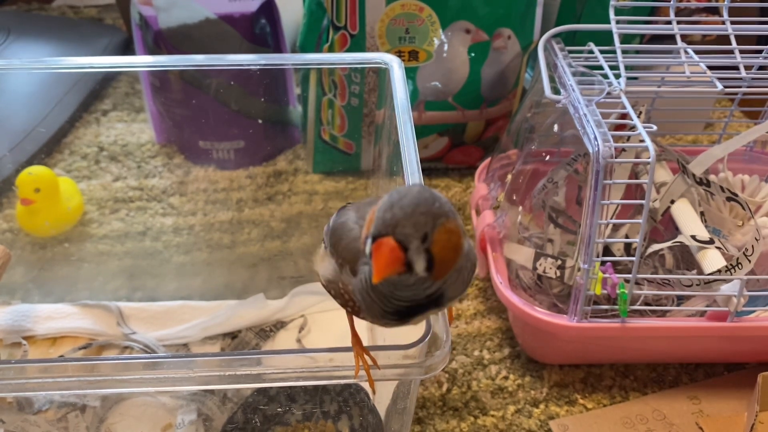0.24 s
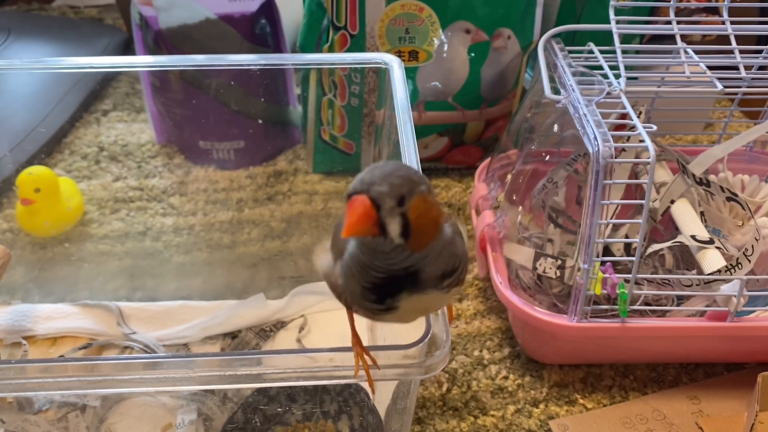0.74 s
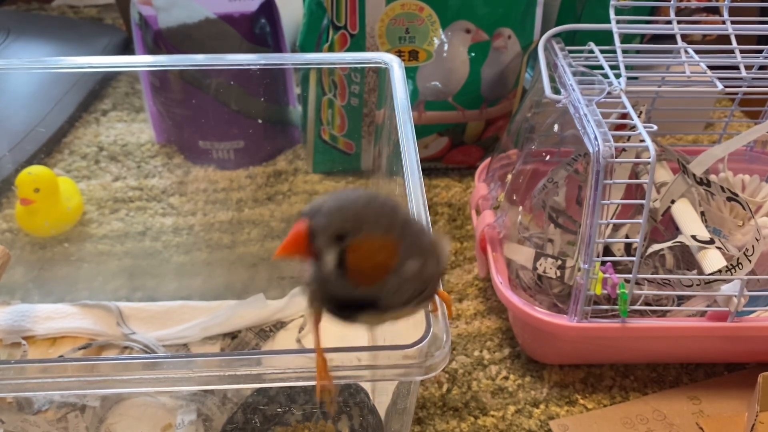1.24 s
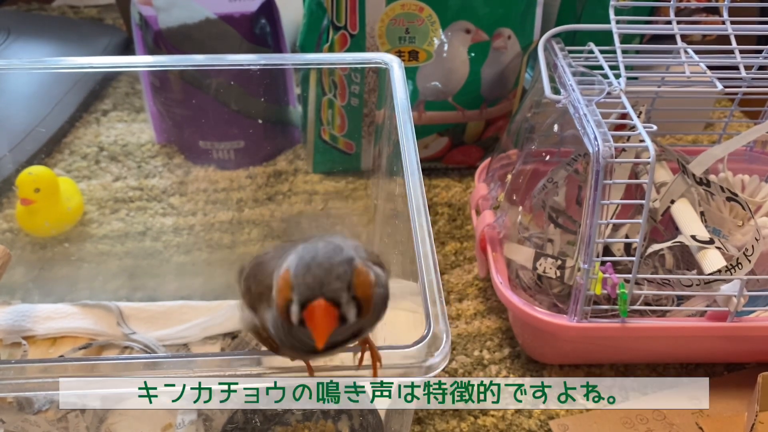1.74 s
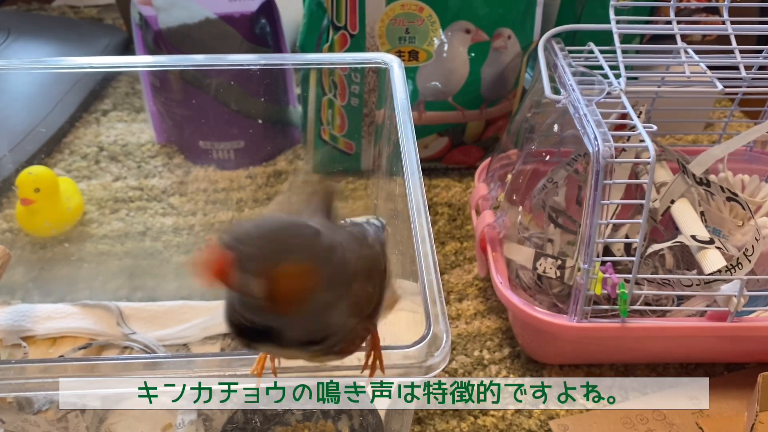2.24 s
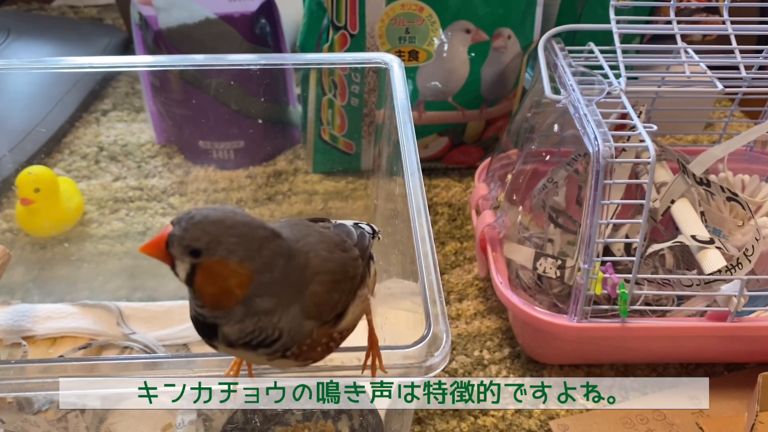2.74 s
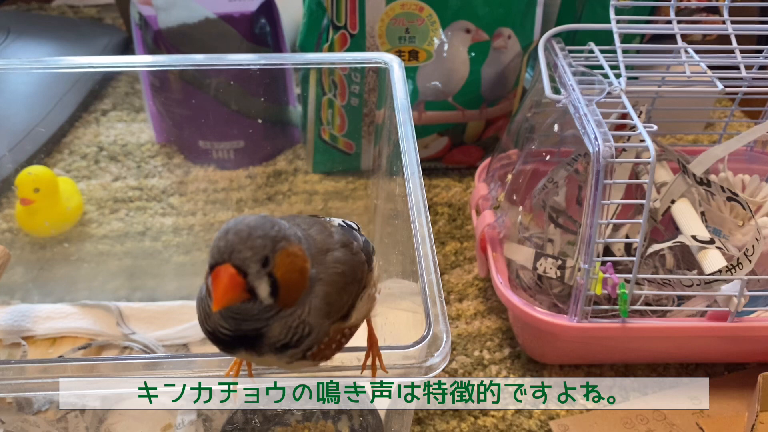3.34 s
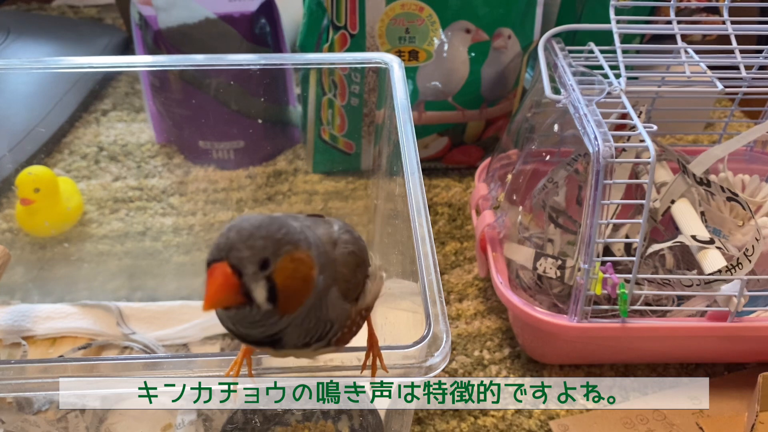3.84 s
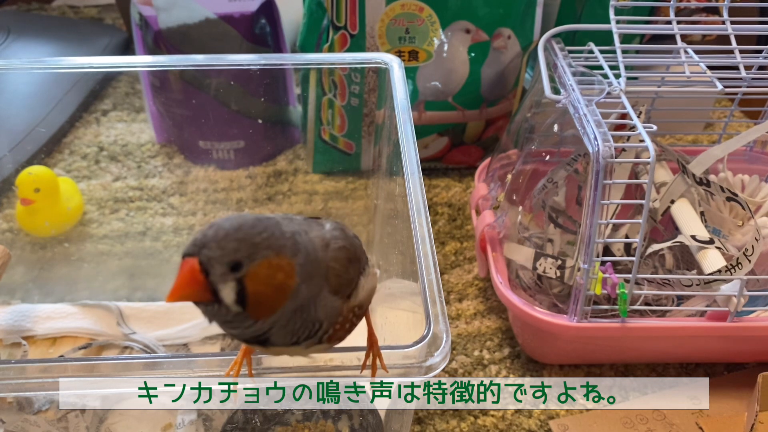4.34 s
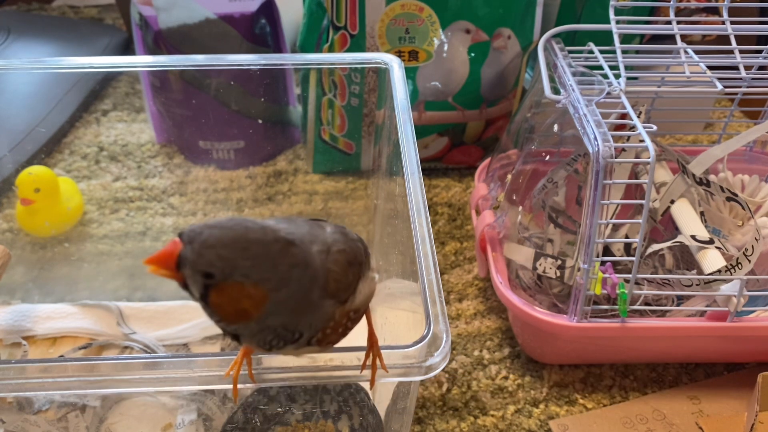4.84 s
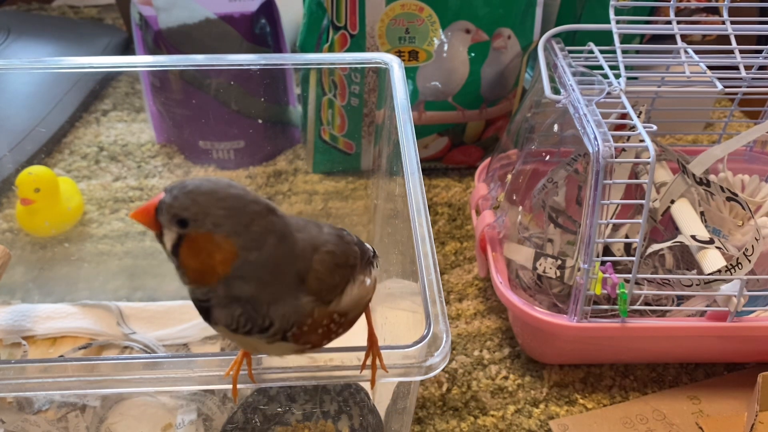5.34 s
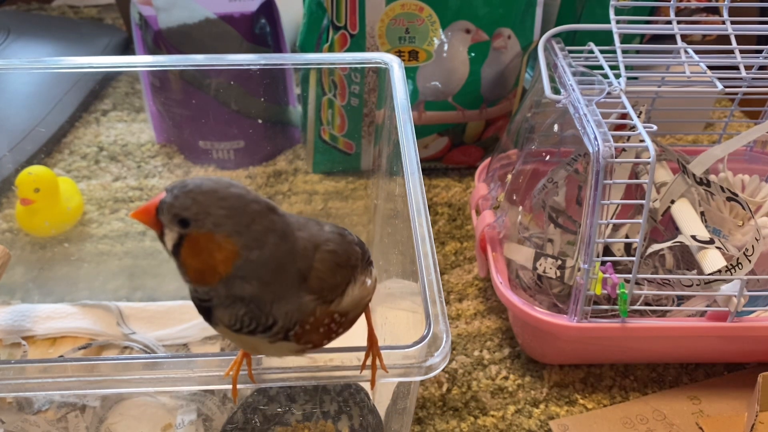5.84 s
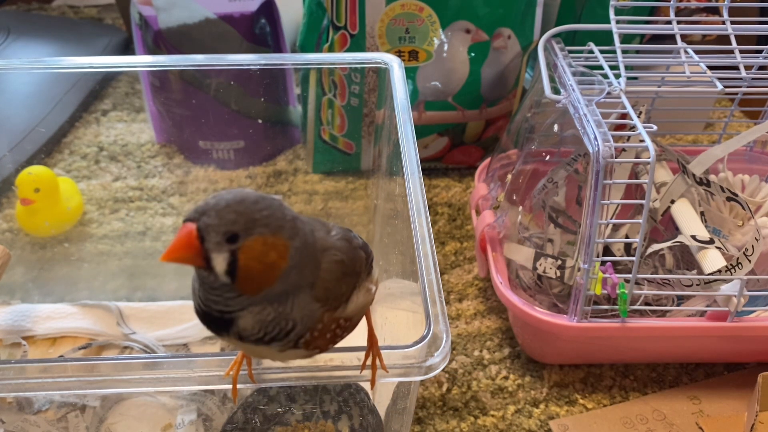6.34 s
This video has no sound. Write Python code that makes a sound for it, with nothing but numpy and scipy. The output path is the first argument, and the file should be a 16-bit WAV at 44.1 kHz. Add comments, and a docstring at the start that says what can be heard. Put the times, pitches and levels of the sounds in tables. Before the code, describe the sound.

A pet finch gives short nasal notes, hops with fluttering wings, chirps, squeaks and makes one loud nasal call in a quiet room.

```python
"""A pet zebra finch on a plastic box, left of a stereo microphone in a quiet room with a low hum.
It gives a short nasal 'tet', hops with a flutter of wings, chirps twice and squeaks, then utters one
loud two-part nasal call and a last 'tet'. Its voice is syrinx pulses and turbulent air ringing in
throat and beak; feathers, wingbeats and claws on the plastic make short bursts of noise."""
import sys
import numpy as np
from scipy import signal
from scipy.fft import rfft, irfft, next_fast_len
from scipy.io import wavfile

SR = 44100
rng = np.random.default_rng(int(sys.argv[2]) if len(sys.argv) > 2 else 0)


def put_to_file(sound):
    """Save the sound as 16-bit audio at rate SR, in the file named by the first command-line argument."""
    columns = np.atleast_2d(sound).T  # one column per channel
    safe = np.clip(columns, -1, 1)
    whole_steps = np.round(safe * 32767)
    wavfile.write(sys.argv[1], SR, whole_steps.astype(np.int16))


N = 290619
TIME = np.arange(N) / SR
FFT_SIZE = 2 * next_fast_len(N // 2 + SR // 20)
BIN_HZ = np.fft.rfftfreq(FFT_SIZE, 1 / SR)
CUTOFF_HZ = 16000


def from_db(db):
    return 10 ** (np.asarray(db) / 20)


def rms_one(x):
    return x / np.sqrt(np.mean(x ** 2) + 1e-20)


def at_hz(points, hz, column=1):
    """Read a column of a spectrum on a log-frequency axis."""
    points = np.array(points)
    return np.interp(np.log(hz + 1e-3), np.log(points[:, 0]), points[:, column])


def drift(rate_hz, size):
    """Smooth random wander of spread 1."""
    hz = np.fft.rfftfreq(size, 1 / SR)
    return rms_one(irfft(rfft(rng.standard_normal(size)) / (1 + (hz / rate_hz) ** 2), size))


def colour(x, spectrum):
    """Causal (minimum-phase) filter with the given spectrum."""
    size = 2 * next_fast_len(x.shape[-1] // 2 + SR // 20)
    gain = from_db(at_hz(spectrum, np.fft.rfftfreq(size, 1 / SR)))
    cepstrum = irfft(np.log(gain))
    cepstrum[1:size // 2] *= 2
    cepstrum[size // 2 + 1:] = 0
    return irfft(rfft(x, size) * np.exp(rfft(cepstrum)))[..., :x.shape[-1]]


def stereo_noise(spectrum, width):
    """Steady noise, shared by both channels apart from a side part."""
    mid, side = colour(rng.standard_normal((2, N)), spectrum)
    return rms_one(mid) + width * rms_one(side) * np.array([[1], [-1]])


# Rumble and hiss of the room at rest: freq_hz, gain_db
ROOM_RUMBLE = [(15, -38), (30, -21), (44, -5.5), (68, 1), (95, -2.5), (120, -1.5), (140, -13), (160, -16.5),
               (182, -9.5), (208, -18), (235, -13), (280, -19.5), (400, -34.5), (1500, -90.5)]
ROOM_HISS = [(300, -5.5), (450, 1.5), (800, 0.5), (1400, -6.5), (2350, -5.5), (2650, -2.5), (3200, -7.5),
             (4200, -10), (4750, -0.5), (5200, -9.5), (7300, -14), (9000, -24.5), (12000, -27.5),
             (16000, -42)]
# Hum and faint motor tones in the room: pitch_hz, level_db
HUM_TONES = [(116, -55.5), (475, -77), (820, -81), (1060, -84), (1140, -81)]

def room_tone(rumble_db=-50, hiss_db=-66.8):
    """Low rumble and a wavering hum, a little right of the microphone, under a faint hiss."""
    hum = np.zeros(N)
    for pitch_hz, level_db in HUM_TONES:
        phase = 2 * np.pi * np.cumsum(pitch_hz + 3 * drift(6, N)) / SR
        hum += np.sin(phase) * from_db(level_db + 2.3 * drift(5.4, N))
    low = from_db(rumble_db) * stereo_noise(ROOM_RUMBLE, width=.249) + hum
    hiss = from_db(hiss_db) * stereo_noise(ROOM_HISS, width=.84)
    return low * from_db([[-1.7], [1.5]]) + hiss


def glide(start_s, length_s, first_hz, last_hz, level_db, attack_s, release_s, bend=1, edge_db=20):
    """Gesture of a short note that slides, swells and sinks: time_s, pitch_hz, level_db."""
    age = np.arange(0, length_s, 1 / 4000)
    remaining = length_s - age
    pitch = last_hz + (first_hz - last_hz) * (remaining / length_s) ** bend
    edges = np.clip(1 - age / attack_s, 0, 1) ** 2 + np.clip(1 - remaining / release_s, 0, 1) ** 2
    return np.column_stack([start_s + age, pitch, level_db - edge_db * edges])


# Turbulent air in the voice: freq_hz, gain_db
BREATH = [(500, -4), (3000, -2.5), (6000, 4.5), (10000, 8.5), (16000, 6.5)]
# The beak held still: time_s, mouth_hz, resonance_db, treble_db
BEAK_AT_REST = [(0, 3200, -1, 6.5)]

def syrinx(gesture, throat, rough, jitter, gain_db=0, gape=BEAK_AT_REST):
    """Syrinx pulses, each with a spurt of turbulence, ring in throat and beak."""
    times, pitch_hz, level_db = np.transpose(gesture)
    fade_s = .004
    span = (TIME > times.min() - fade_s) & (TIME < times.max() + fade_s)
    t = TIME[span]
    pitch = np.interp(t, times, pitch_hz) * (1 + jitter * drift(460, len(t)))
    phase = 2 * np.pi * np.cumsum(pitch) / SR
    harmonic = np.arange(1, int(CUTOFF_HZ / pitch.min()) + 1)[:, None]
    gape_s, *columns = np.transpose(gape)
    mouth_hz, resonance_db, treble_db = (np.interp(t, gape_s, column) for column in columns)
    mouth = from_db(resonance_db * np.exp(-(np.log2(harmonic * pitch / mouth_hz) / .26) ** 2))
    partials = mouth * np.cos(harmonic * phase) * (harmonic * pitch < CUTOFF_HZ)
    pulses = rms_one(partials.sum(axis=0))
    spurts = rms_one(colour(rng.standard_normal(len(t)) * (1 + np.cos(phase)), BREATH))
    voice = colour(pulses + rough * spurts, throat)
    treble = signal.sosfiltfilt(signal.butter(3, 5500, "high", fs=SR, output="sos"), voice)
    voice += (from_db(treble_db) - 1) * treble
    # loudness follows the air pressure, wherever the harmonics fall
    power = signal.convolve(voice ** 2, np.hanning(SR // 150), "same") / (SR // 300)
    pressure = from_db(gain_db + np.interp(t, times, level_db))
    fade = np.clip(np.minimum(t - t[0], t[-1] - t) / fade_s, 0, 1) ** 2
    out = np.zeros(N)
    out[span] = voice / np.sqrt(np.abs(power) + 1e-12) * pressure * fade
    return out


# A faint note from the perch: start_s, length_s, first_hz, last_hz, level_db
FAINT_NOTE = (0, .06, 2290, 2480, -49)
# Its throat colour: freq_hz, gain_db
FAINT_COLOUR = [(800, -14), (1700, -9), (2400, 1), (3200, -9), (4700, -28), (8000, -40), (16000, -36)]

def thin_note():
    """A thin rising note, more breath than tone."""
    gesture = glide(*FAINT_NOTE, attack_s=.001, release_s=.065, bend=2.5)
    return syrinx(gesture, FAINT_COLOUR, rough=2.5, jitter=.04)


def near_walls(x, level_db, t60_s=.022):
    """The hard walls of the box, close to the bird, scatter its voice back within milliseconds."""
    t = TIME[:SR // 40]
    scatter = rng.standard_normal(len(t)) * from_db(-60 * t / t60_s) * (t > .0005)
    response = (t == 0) + from_db(level_db) * scatter / np.linalg.norm(scatter)
    return signal.fftconvolve(x, response / np.linalg.norm(response))[:N]


# 'Tet' calls at the box: start_s, length_s, first_hz, last_hz, level_db, attack_s, widest_s, open_s
TET_NOTES = [(.308, .022, 680, 520, -42.5, .003, .005, .008),
             (.3255, .0375, 545, 445, -28.6, .007, .004, .011),
             (6.0205, .042, 760, 440, -30.3, .018, .009, .005)]
# Their throat colour: freq_hz, gain_db
TET_COLOUR = [(440, -11), (620, -4.5), (850, -2.5), (1300, -6.5), (2400, -1), (3100, -2), (4200, -8),
              (5200, -8), (6300, -12.5), (7500, -17.5), (9000, -14.5), (10500, -24.5), (13000, -29),
              (15500, -27)]
BEAK_NARROW, BEAK_WIDE = (3200, 6.5, -6), (6800, 8, 2)   # mouth_hz, resonance_db, treble_db

def tets(second_ratio=1.32, second_db=-7):
    """Both sides of the syrinx pulse unevenly, one faster and weaker, as the beak flicks open."""
    out = np.zeros(N)
    for *note, widest_s, open_s in TET_NOTES:
        first_side = glide(*note, release_s=.018, bend=3)
        second_side = first_side * [1, second_ratio, 1] + [0, 0, second_db]
        t = first_side[:, 0]
        wide = np.exp(-((t - t[0] - widest_s) / open_s) ** 2)
        gape = np.column_stack([t, np.outer(wide, BEAK_WIDE) + np.outer(1 - wide, BEAK_NARROW)])
        for side in (first_side, second_side):
            out += syrinx(side, TET_COLOUR, rough=.28, jitter=.035, gape=gape)
    return near_walls(out, level_db=-4)


def bursts(events, spectrum, rise_s, grain_db):
    """Brief grainy bursts of friction or air, dying away in one shared colour."""
    envelope = np.zeros(N)
    for start_s, level_db, decay_s in events:
        age = np.clip(TIME - start_s, 0, 1)
        envelope += from_db(level_db - 60 * age / (decay_s + rise_s)) * (1 - np.exp(-age / rise_s))
    grains = rng.standard_normal(N) * from_db(grain_db * drift(700, N))
    return colour(grains * envelope, spectrum) / np.std(colour(grains, spectrum))


# Feet landing on the box: start_s, level_db, decay_s
FOOTFALLS = [(1.226, -57, .16), (1.26, -55.5, .11), (1.588, -47.5, .058), (1.65, -51, .1),
             (1.9635, -37.5, .045), (1.977, -51.5, .15), (2.297, -58, .097), (3.668, -57, .05),
             (3.84, -55, .05)]
# Colour of the plastic: freq_hz, gain_db
BOX_COLOUR = [(150, 0.5), (320, 5), (550, 3), (900, 0), (1600, 5), (2600, 1.5), (4200, -10), (6500, -12.5),
              (9000, -14), (16000, -30)]
# Claw tips on the box: start_s, level_db, ring_hz, decay_s
CLAW_TAPS = [(1.565, -47, 4000, .06), (1.723, -44.5, 3080, .06), (1.9638, -47, 2630, .06),
             (2.264, -49.5, 9000, .016)]

def claws():
    """Claws strike the plastic; each tap of a tip is a scratch ringing in one broad resonance."""
    out = bursts(FOOTFALLS, BOX_COLOUR, rise_s=.001, grain_db=3)
    for start_s, level_db, ring_hz, decay_s in CLAW_TAPS:
        age = np.clip(TIME - start_s, 0, 1)
        scratch = rng.standard_normal(N) * (age > 0) * from_db(level_db - 60 * age / decay_s)
        b, a = signal.iirpeak(ring_hz, Q=3, fs=SR)
        out += signal.lfilter(b, a, scratch) / np.sqrt(b[0])
    return out


# Feather flicks and puffs of air over the box: start_s, level_db
FEATHER_FLICKS = [(1.25, -62), (1.563, -47), (1.587, -43.5), (1.605, -43), (1.632, -47.5), (1.655, -49),
                  (1.68, -38.5), (1.706, -39), (1.732, -42.5), (1.945, -53), (1.979, -53), (2.315, -60)]
WING_PUFFS = [(1.648, -34), (1.69, -33), (1.958, -34.5)]
# Their colours: freq_hz, gain_db
FLICK_COLOUR = [(300, 8), (600, -8), (1500, 4), (3000, -2.5), (6000, -6), (8500, -2.5), (12000, -5),
                (16000, -3.5)]
PUFF_COLOUR = [(25, 6), (48, 3.5), (90, -3.5), (200, -14.5), (430, -11), (700, -24.5), (3000, -74)]

def wings(flick_decay_s=.047, puff_decay_s=.14):
    """Wing and tail feathers flick, and the wingbeats push low puffs of air."""
    flicks = [(*row, flick_decay_s) for row in FEATHER_FLICKS]
    puffs = [(*row, puff_decay_s) for row in WING_PUFFS]
    feathers = bursts(flicks, FLICK_COLOUR, rise_s=.0023, grain_db=1.5)
    return feathers + bursts(puffs, PUFF_COLOUR, rise_s=.008, grain_db=0)


# Rustles, barely audible at the microphone: peak_s, half_length_s, level_db
RUSTLE_SWELLS = [(2.96, .11, -63.5), (3.55, .05, -68), (3.74, .12, -68), (3.5, .55, -78)]
# Their colour: freq_hz, gain_db
RUSTLE_COLOUR = [(2000, -17.5), (5000, 0.5), (7500, -1.5), (11000, -2), (16000, -2.5)]

def rustle():
    """The plumage rustles in soft swells."""
    swells = sum(from_db(level_db) * np.exp(-((TIME - peak_s) / half_s) ** 2)
                 for peak_s, half_s, level_db in RUSTLE_SWELLS)
    return swells * rms_one(colour(rng.standard_normal(N), RUSTLE_COLOUR))


# Soft notes from the perch: start_s, length_s, first_hz, last_hz, level_db
MUTTER_NOTES = [(3.49, .024, 800, 620, -53), (3.662, .022, 740, 690, -49), (4.616, .018, 1010, 880, -54)]
# Colour of the closed beak: freq_hz, gain_db
MUTTER_COLOUR = [(400, 5), (720, -1.5), (1400, -10.5), (2800, -19.5), (5000, -29.5), (16000, -41)]

def mutters():
    """Breathy falling notes, muffled by the closed beak."""
    gestures = [glide(*row, attack_s=.009, release_s=.009) for row in MUTTER_NOTES]
    return sum(syrinx(gesture, MUTTER_COLOUR, rough=1.2, jitter=.04) for gesture in gestures)


def warbled(gesture, share, rate_hz=125, db_per_share=50):
    """High notes tremble by a share of their pitch, growing louder as they go up."""
    t, pitch, level = gesture.T
    swing = share * np.sin(2 * np.pi * rate_hz * (t - t[0]))
    return np.column_stack([t, pitch * (1 + swing), level + db_per_share * swing])


# Chirps, clear above the room: start_s, length_s, first_hz, last_hz, level_db, warble_share
CHIRP_NOTES = [(3.7525, .024, 3850, 6300, -23.5, .055), (3.961, .0205, 3350, 5300, -24.7, .02)]
# Their throat colour: freq_hz, gain_db
CHIRP_COLOUR = [(1500, -18), (2800, -8), (4000, -3), (6300, -2.5), (7500, -21), (10500, -22), (13000, -29),
                (16000, -31)]

def chirps():
    """The syrinx sweeps upward in near-pure, trembling tones."""
    rises = [warbled(glide(*note, attack_s=.015, release_s=.0025, bend=1.4), share)
             for *note, share in CHIRP_NOTES]
    return sum(syrinx(rise, CHIRP_COLOUR, rough=.11, jitter=.014) for rise in rises)


# A squeak from the perch: start_s, length_s, first_hz, last_hz, level_db
SQUEAK_NOTE = (4.1185, .05, 4680, 3850, -31)
# Its throat colour: freq_hz, gain_db
SQUEAK_COLOUR = [(1500, -32), (2900, -7), (3900, 0.5), (4800, -8.5), (5600, -15.5), (6700, -13.5),
                 (8700, -26.5), (11000, -25.5), (15000, -39)]

def squeak():
    """A falling squeak from both sides of the syrinx, the weaker a fourth lower."""
    fall = warbled(glide(*SQUEAK_NOTE, attack_s=.002, release_s=.02), share=.04)
    upper = syrinx(fall, SQUEAK_COLOUR, rough=.26, jitter=.02, gain_db=.3)
    lower = syrinx(fall * [1, 3 / 4, 1], SQUEAK_COLOUR, rough=.15, jitter=.018, gain_db=-21)
    return upper + lower


def sustained(pitch_curve, level_curve, catches, scoop, end_bend, release_s, attack_s=.012):
    """Gesture of a long note: it scoops up, flutters, jumps where it catches and bends as it stops."""
    start_s, end_s = pitch_curve[0][0], pitch_curve[-1][0]
    t = TIME[(TIME > start_s - attack_s) & (TIME < end_s + release_s)]
    before = np.clip((start_s - t) / attack_s, 0, 1)
    after = np.clip((t - end_s) / release_s, 0, 1)
    flutter = drift(rate_hz=80, size=SR)[:len(t)]
    catch = sum((t > catch_s) * np.exp(-np.abs(t - catch_s) / .012) for catch_s, _, _ in catches)
    pitch_hz = np.interp(t, *np.transpose(pitch_curve)) * scoop ** before * end_bend ** after
    pitch_hz *= 1 + .005 * flutter + .01 * catch
    level_db = np.interp(t, *np.transpose(level_curve)) - 20 * (before + after)
    return np.column_stack([t, pitch_hz, level_db + .8 * flutter + 3 * catch])


# Melody of the loud call's high and low parts: time_s, pitch_hz
HIGH_PITCH = [(4.683, 1543), (4.689, 1530), (4.709, 1362), (4.743, 1470), (4.765, 1429), (4.787, 1532),
              (4.797, 1471)]
LOW_PITCH = [(4.86, 739), (4.874, 754), (4.884, 812), (4.902, 801), (4.926, 741), (4.934, 743),
             (4.964, 818), (4.972, 786), (4.986, 771), (5.022, 802), (5.03, 787), (5.04, 814), (5.056, 793),
             (5.078, 820), (5.086, 793), (5.122, 751), (5.136, 760), (5.148, 691), (5.154, 680),
             (5.204, 720), (5.21, 707), (5.246, 806)]
# Their loudness at the perch: time_s, level_db
HIGH_LEVEL = [(4.683, -30), (4.689, -24), (4.745, -31), (4.795, -26), (4.797, -29)]
LOW_LEVEL = [(4.86, -30), (4.895, -21.5), (4.935, -24), (4.96, -21.5), (5.015, -19.5), (5.125, -25.5),
             (5.246, -27)]
# Their throat colours: freq_hz, gain_db
HIGH_COLOUR = [(1450, -13.5), (2900, -1), (4350, 3), (5800, -15.5), (7300, -26.5), (8700, -26),
               (11600, -37.5), (13200, -45), (15300, -28)]
LOW_COLOUR = [(750, -15), (1550, -12.5), (2300, -10.5), (3100, -3.8), (3850, 0), (4600, 0.5), (5400, -9.5),
              (6200, -24.5), (7000, -22), (8500, -30), (10400, -15), (12000, -33), (13600, -40),
              (15500, -27)]
# A soft rising note between them: start_s, length_s, first_hz, last_hz, level_db
LINK_NOTE = (4.806, .033, 1450, 1750, -47.5)
# The beak slowly closing: time_s, mouth_hz, resonance_db, treble_db
CLOSING_BEAK = [(4.8, 4300, -3, 1), (4.86, 3700, 0.5, 1), (5.08, 4100, 4.5, -5.5), (5.16, 3600, 6.5, -1.5),
                (5.25, 3700, -0.5, -16.5)]
# Catches in the voice: start_s, level_db, decay_s
CATCHES = [(4.674, -34, 0.051), (4.856, -30, 0.084), (4.878, -27.5, 0.047), (4.945, -37, 0.036),
           (5.14, -33, 0.065), (5.19, -32, 0.062)]

def loud_call():
    """A nasal call, rich in harmonics, opens high, drops an octave and rasps where the voice catches."""
    high = sustained(HIGH_PITCH, HIGH_LEVEL, CATCHES, scoop=.6, end_bend=.9, release_s=.007)
    link = glide(*LINK_NOTE, attack_s=.006, release_s=.004)
    low = sustained(LOW_PITCH, LOW_LEVEL, CATCHES, scoop=.97, end_bend=1.16, release_s=.018)
    voice = syrinx(high, HIGH_COLOUR, rough=.35, jitter=.018, gain_db=.3, gape=CLOSING_BEAK)
    voice += syrinx(link, HIGH_COLOUR, rough=.6, jitter=.025, gape=CLOSING_BEAK)
    voice += syrinx(low, LOW_COLOUR, rough=.1, jitter=.009, gape=CLOSING_BEAK)
    rasp = bursts(CATCHES, LOW_COLOUR, rise_s=.0018, grain_db=5)
    return near_walls(voice + rasp, level_db=-17)


# Direct path from perch to microphone: freq_hz, left_over_right_db, left_lead_rad
MIC_PATH = [(301, 10.5, 0.69), (550, 6.5, 0.038), (850, 12, 0.049), (1500, 6.5, 1.9), (2160, 5.5, 1.47),
            (2380, 11, 1.1), (2900, 4.5, 0.39), (3700, 1, 0.4), (4900, 6, 0.39), (5700, 10.5, 1.3),
            (7000, -3.5, 0)]

def at_microphone(x, level_share):
    """At most frequencies the left capsule hears the bird louder and earlier."""
    half_db = level_share * at_hz(MIC_PATH, BIN_HZ) / 2
    left = from_db(half_db) * np.exp(.5j * at_hz(MIC_PATH, BIN_HZ, column=2))
    pair = np.array([left, 1 / left])
    pair /= np.sqrt(np.mean(np.abs(pair) ** 2, axis=0))
    return irfft(rfft(x, FFT_SIZE) * pair)[:, :N]


def room_reverb(x, t60_s=.25, tail_db=-19.5, echo_s=.033, echo_db=-31):
    """A soft diffuse tail, dulled by the furnishings, and one echo off a wall."""
    t = TIME[:SR // 2]
    tail = rng.standard_normal((2, len(t))) * from_db(-60 * t / t60_s) * (1 - np.exp(-t / .003))
    response = from_db(tail_db) * tail / np.sqrt(np.sum(tail ** 2) / 2)
    response[:, int(echo_s * SR)] += from_db(echo_db)
    response = signal.sosfilt(signal.butter(2, 7000, fs=SR, output="sos"), response)
    return signal.fftconvolve(x[None], response, axes=1)[:, :N]


def scene():
    """The finch, near enough to outweigh its reverberation, over the room tone."""
    calls = tets() + loud_call()
    small_notes = thin_note() + mutters() + chirps() + squeak()
    moves = claws() + wings() + rustle()
    direct = at_microphone(calls, 1) + at_microphone(small_notes, .54) + at_microphone(moves, .84)
    return direct + room_reverb(calls + small_notes + moves) + room_tone()


def record(dry):
    """In the high treble both channels carry one signal, later on the left; the top is cut."""
    shared_from_hz, lag_s = 6900, .000232
    left, right = rfft(dry, FFT_SIZE)
    delayed = right * np.exp(-2j * np.pi * (BIN_HZ - shared_from_hz) * lag_s)
    left = np.where(BIN_HZ > shared_from_hz, delayed, left)
    low_pass = 1 / np.sqrt(1 + (BIN_HZ / CUTOFF_HZ) ** 300)
    return irfft(np.array([left, right]) * low_pass)[:, :N]


dry = scene()
out = record(dry)
put_to_file(out)
```